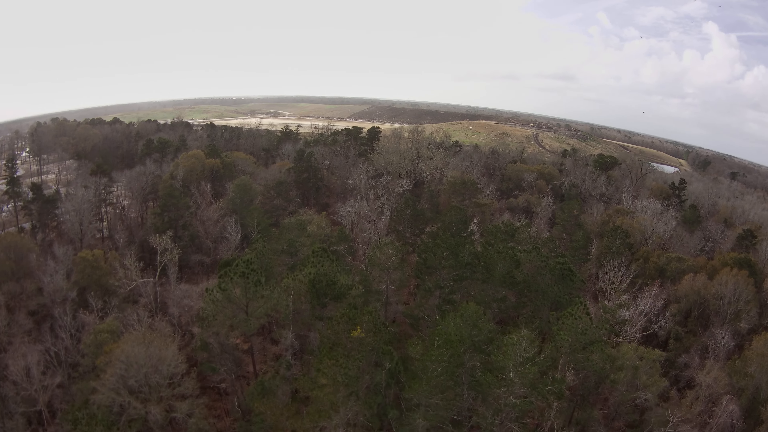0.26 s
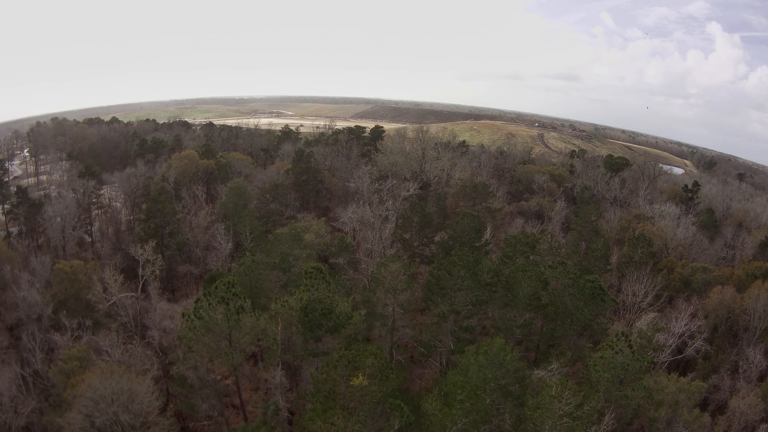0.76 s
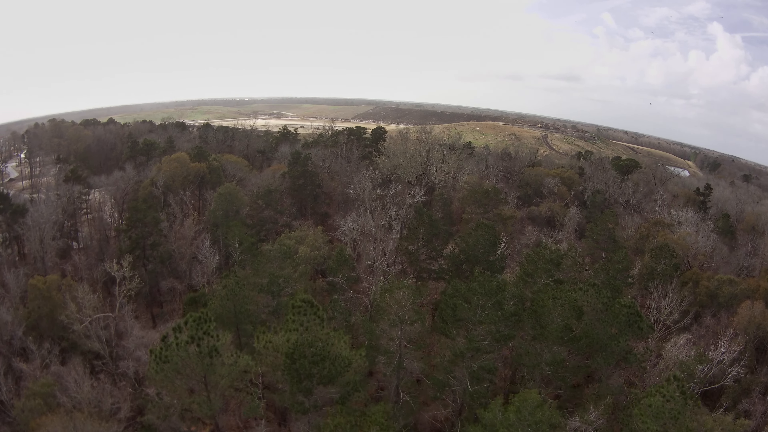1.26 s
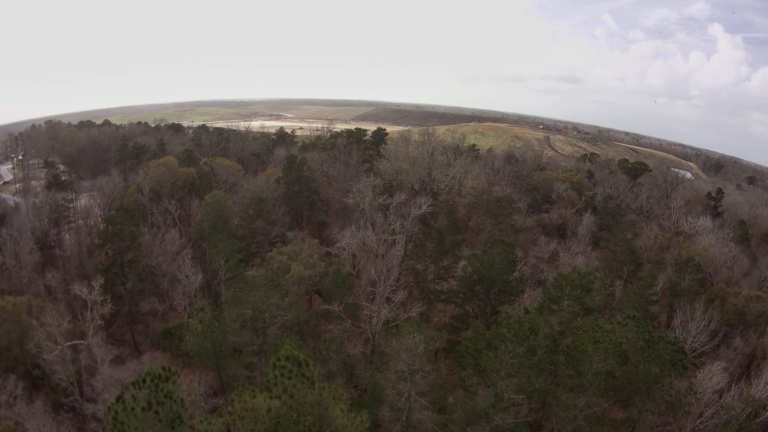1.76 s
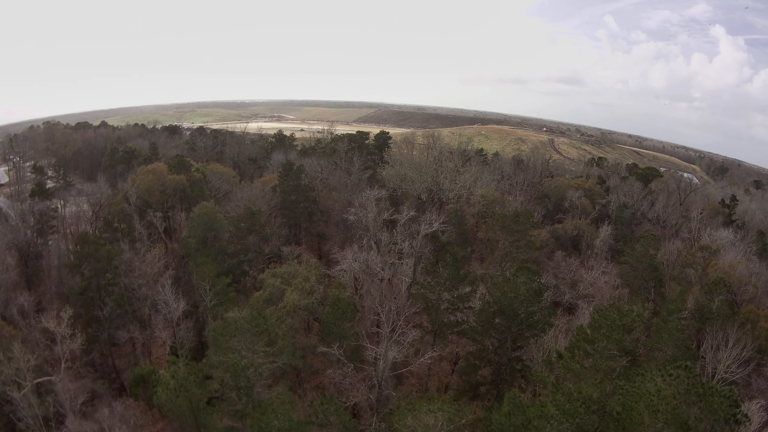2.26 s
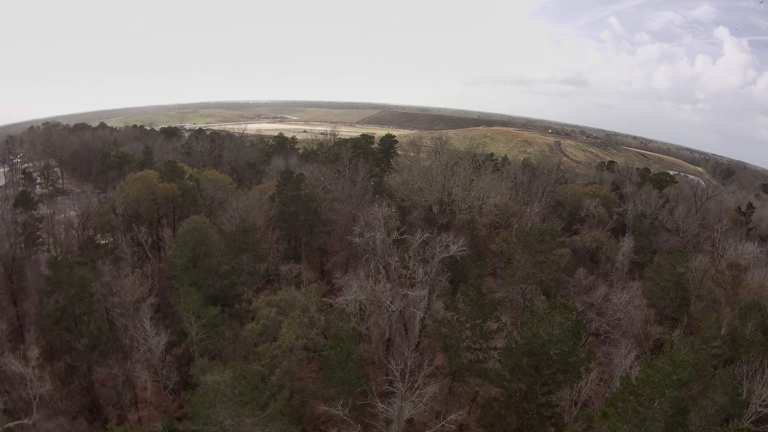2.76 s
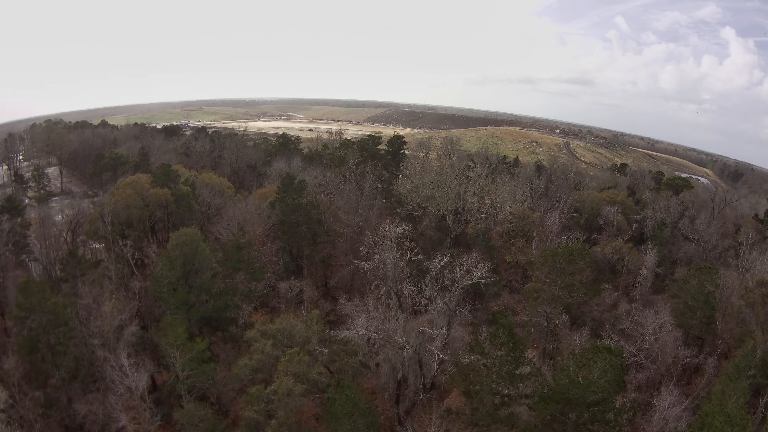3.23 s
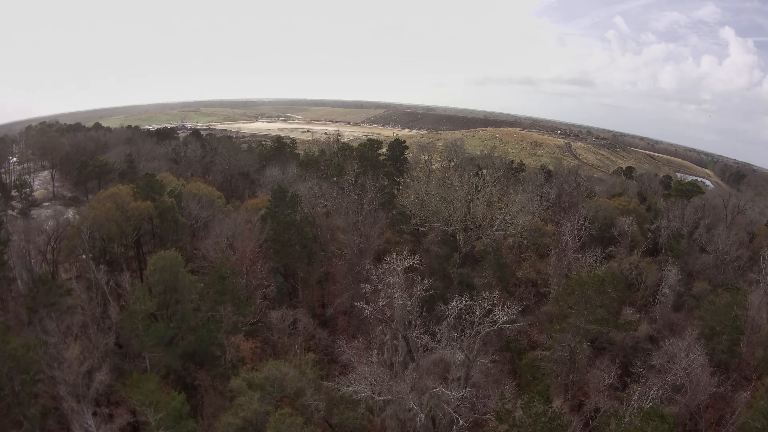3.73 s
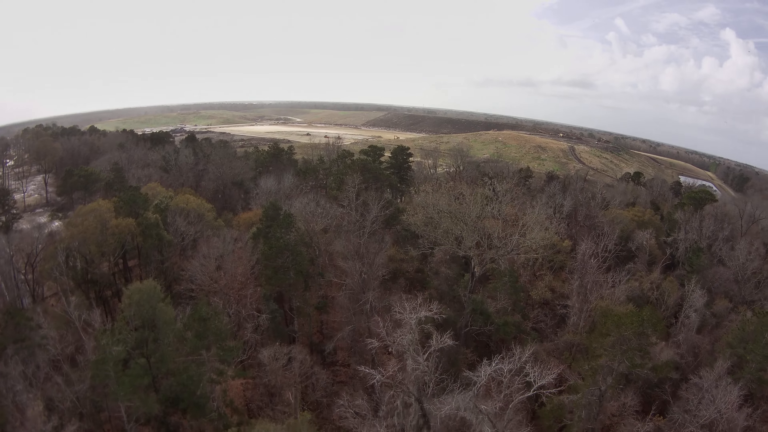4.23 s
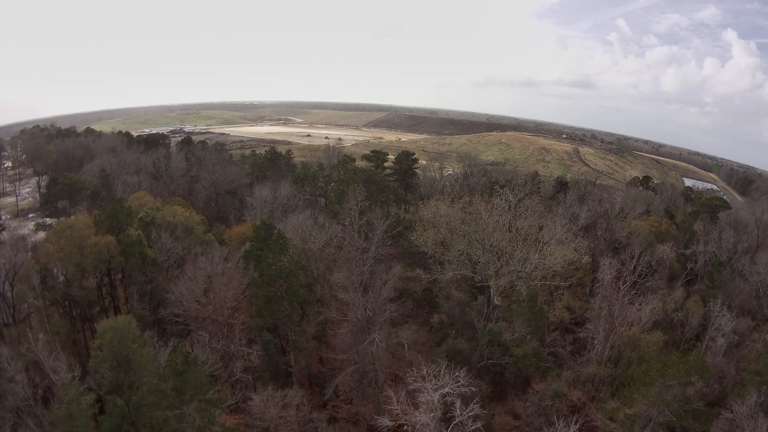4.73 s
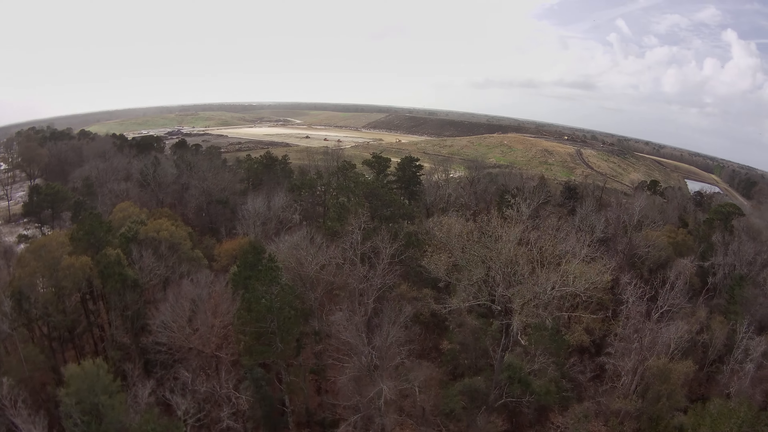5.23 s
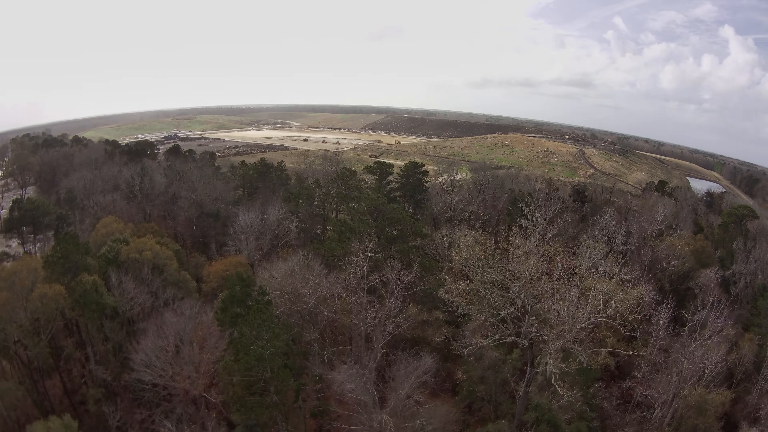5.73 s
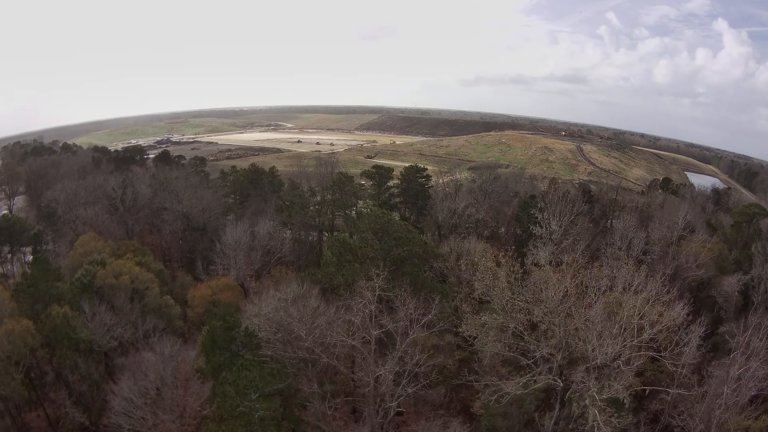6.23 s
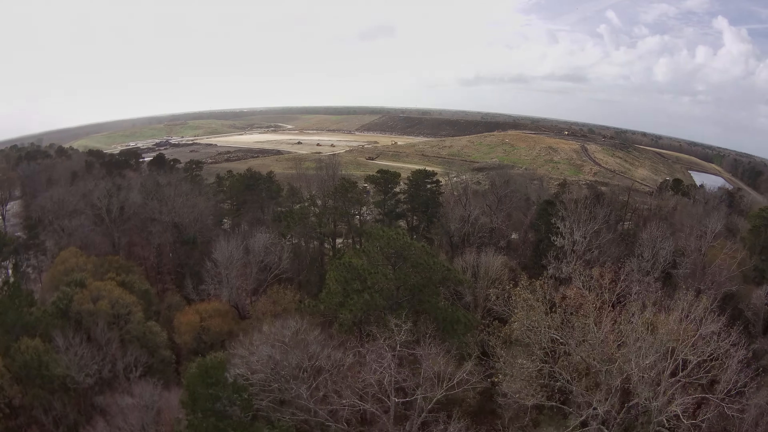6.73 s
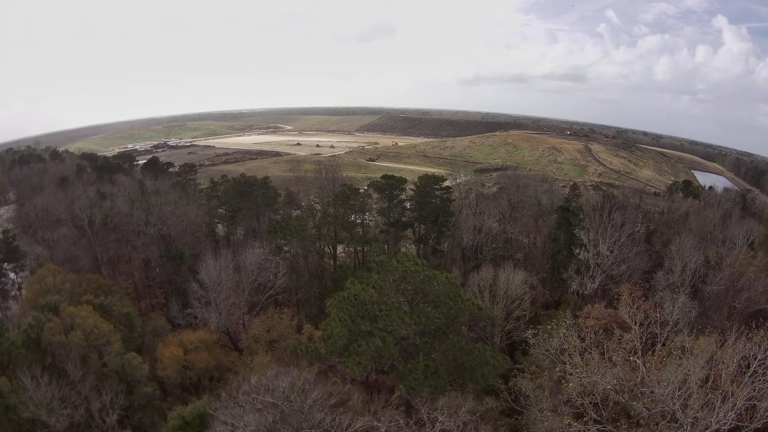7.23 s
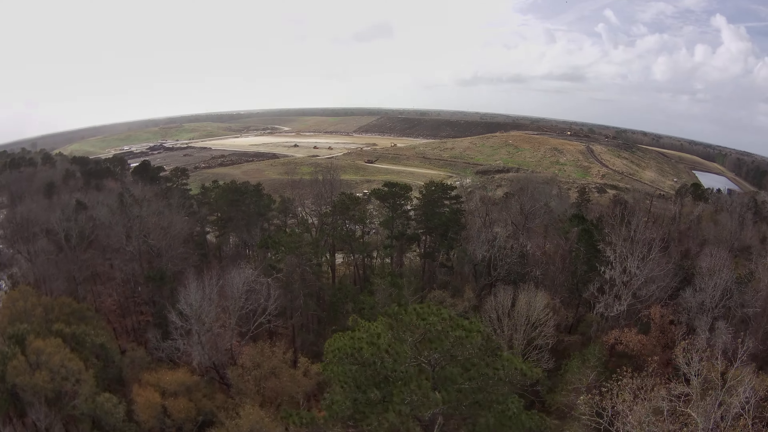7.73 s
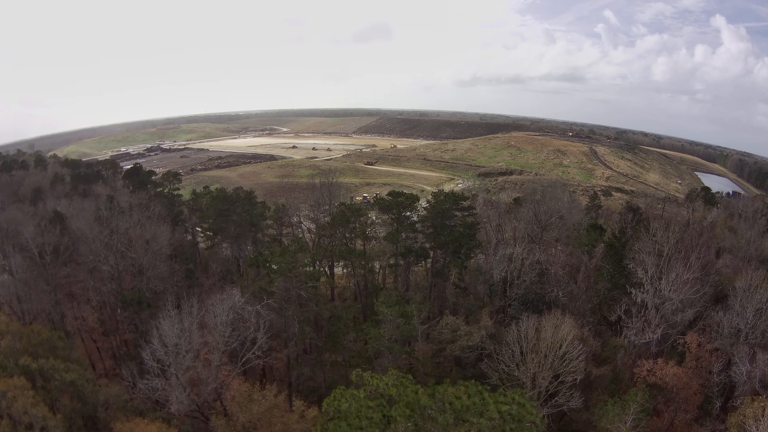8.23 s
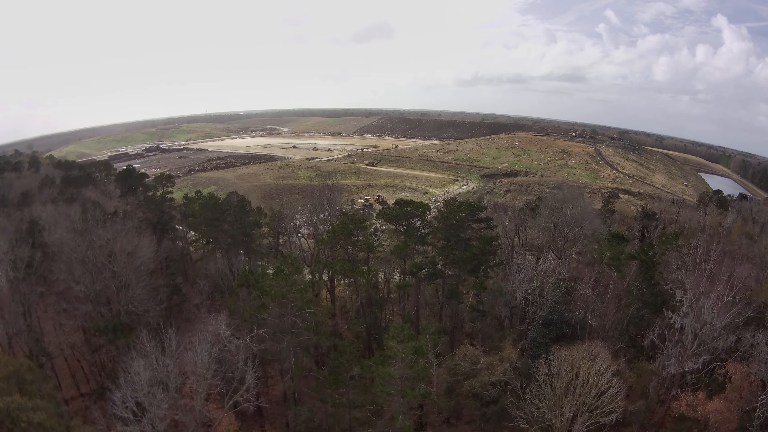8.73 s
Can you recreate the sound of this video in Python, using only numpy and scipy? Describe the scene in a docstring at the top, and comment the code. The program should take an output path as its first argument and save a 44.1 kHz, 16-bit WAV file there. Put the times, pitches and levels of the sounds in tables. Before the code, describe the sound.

Constant close drone buzz from start to end, without pause. Near propellers slap the left microphone with saw-like pulses, gritty air noise and hiss, while the right microphone picks up the vibrating frame and softer blade rush. Slightly mistuned rotors beat against each other, flutter roughens briefly in gusts, and the tone droops a little in the later part. Open air, no echo.

```python
"""A rough, beating rotor buzz throughout: a quadcopter whose four two-blade rotors slowly ease off.
The left port, fixed to the frame, sits in the wash of the near rotors: each blade slaps it with a
saw-shaped pressure wave and bursts of rasp and hiss, over a bed of rumble.
The sheltered right port hears the shaking, rattling frame and the rush of the blades.
Motor whine reaches both ports."""
import sys
import numpy as np
from scipy.fft import rfft, irfft
from scipy.io import wavfile

SR = 44100
rng = np.random.default_rng(int(sys.argv[2]) if len(sys.argv) > 2 else 0)


def output_pcm(signal):
    """Save a mono or channel-first signal as 16-bit PCM at the path in sys.argv[1].

    Samples are clipped to [-1, 1] before scaling.
    """
    pcm = np.clip(np.atleast_2d(signal).T, -1, 1) * 32767
    wavfile.write(sys.argv[1], SR, np.round(pcm).astype(np.int16))


N = 396018

# Speed of the near rotors, as the autopilot trims them: (time [s], blade rate [passes per s])
FIRST_ROTOR_SPEED = [(0.0, 468.1), (0.57, 466.2), (0.94, 471.9), (1.18, 460.4), (1.34, 474.4),
                     (1.91, 459.9), (2.0, 470.7), (2.1, 460.6), (2.77, 473.9), (3.01, 469.8), (3.44, 475.8),
                     (3.87, 459.6), (3.95, 463.1), (4.56, 454.5), (4.99, 461.7), (5.39, 444.8),
                     (5.6, 445.4), (5.68, 463.8), (5.99, 445.5), (6.76, 450.4), (6.98, 440.0),
                     (7.21, 441.1), (7.35, 451.0), (8.08, 436.8), (8.27, 423.5), (8.98, 424.5)]
SECOND_ROTOR_SPEED = [(0.0, 454.7), (0.61, 439.2), (1.19, 458.7), (1.24, 449.3), (1.64, 470.8),
                      (1.88, 455.7), (2.25, 462.8), (2.35, 460.1), (2.73, 480.5), (2.99, 444.3),
                      (3.35, 426.3), (3.45, 446.6), (3.72, 433.1), (3.73, 444.8), (4.89, 432.1),
                      (4.92, 417.6), (5.39, 442.0), (5.68, 411.0), (6.03, 432.0), (6.63, 425.0),
                      (6.84, 403.1), (7.37, 400.7), (7.56, 419.9), (8.25, 405.4), (8.74, 389.6),
                      (8.98, 404.5)]
# Speed the far pair follows: (share of first rotor in a near-pair mix [0-1], added rate [passes per s])
FAR_ROTOR_SPEED = [(.4, 62.3), (.65, 66)]
# Pockets of rough air: (middle [s], half length [s], added blade flutter [rad])
ROUGH_AIR_POCKETS = [(2.05, 0.29, 0.23), (3.0, 0.26, .17), (4.82, 0.16, 0.17), (5.68, .07, 0.2)]
# Pressure wave of a blade, before load and gusts:
# (multiple of blade rate, first rotor level [dB], second rotor level [dB])
BLADE_HARMONICS = [(1, -8.7, -19.2), (2, -17.1, -30), (3, -24, -39), (4, -32, -50), (5, -40, -54),
                   (6, -43, -58)]
# Noise colours of the wash, before their level changes: (frequency [Hz], level [dB per Hz])
RUMBLE_SPECTRUM = [(20, -66), (38, -79), (60, -51), (90, -44.5), (130, -40), (190, -40), (330, -46),
                   (580, -49.5), (800, -50.5), (1100, -54), (1500, -53.5), (2200, -63.5), (5000, -68.5)]
RASP_SPECTRUM = [(500, -73.5), (1500, -62.5), (2500, -62), (4000, -62), (5300, -62.5), (6200, -57.5),
                 (6900, -65), (9000, -67), (14000, -76)]
HISS_SPECTRUM = [(2000, -73.5), (5000, -65.5), (8000, -75), (10500, -64), (12000, -63), (13200, -56.5),
                 (14400, -53.5), (15500, -51.5)]
# Level curve of the hiss, around its base gain: (time [s], level [dB])
HISS_CURVE = [(0.1, 0), (0.6, 0.5), (1.7, 1), (2.4, 2.5), (2.8, 0.5), (4.2, 0.5), (4.65, -1), (5.7, 1.7),
              (6.3, -0.2), (7.15, -2.3), (7.5, -0.2), (8.9, 0.5)]
# Shaking of the frame, before resonance, waver and port level:
# (multiple of shaft rate, rotor one [dB], rotor two [dB], rotor three [dB], rotor four [dB])
SHAFT_HARMONICS = [(1, -37, -46, -38.5, -52), (2, -20.2, -25, -27.5, -36), (3, -34, -37, -39.5, -48),
                   (4, -44, -38, -37.5, -46), (5, -49, -48, -38, -42), (6, -35, -35, -34, -40),
                   (7, -47, -43, -53, -53), (8, -54, -50, -54, -57), (10, -54, -49, -55, -57)]
# Lag of each rotor's blade tone at the sheltered port behind the open one: one value per rotor [rad]
SHELTERED_LAG = [2.2, 0.6, -2, 4.5]
# Sum tones of the rattling frame:
# (near rotor [0 or 1], multiple of third shaft added to its blade rate, level [dB])
RATTLE_TONES = [(1, 2, -40), (0, 3, -35), (1, 3, -39), (0, 4, -33), (1, 4, -36)]
# Motor whine as the shell passes it, before each motor's trim:
# (frequency [Hz], open port level [dB], sheltered port level [dB])
SHELL_RESPONSE = [(7000, -42, -41), (7600, -34.5, -41), (7900, -41, -44), (8150, -40, -46),
                  (8500, -37.5, -52), (9000, -42, -46), (9500, -36.5, -45), (10500, -45, -80),
                  (14300, -32.5, -75), (15500, -37, -80)]
# Trim of each motor: (whine gain [dB], octave gain [dB])
MOTOR_TRIMS = [(.5, -5), (-2.5, 6), (0, -7), (0, -7)]
# Rush of the blades at the sheltered port: (frequency [Hz], level [dB per Hz])
RUSH_SPECTRUM = [(20, -90), (90, -76), (140, -77), (250, -66), (330, -68), (580, -61), (700, -56),
                 (850, -62), (1100, -61), (1400, -54.5), (1900, -64), (2250, -61), (3500, -62), (4400, -72),
                 (5300, -72), (6000, -67), (6800, -76), (7700, -70), (9300, -82), (10200, -112)]

# Random movements below are given as spreads; their pace is the argument of drift().
HUNT_HZ, HUNT_PACE = 1.5, 2   # far rotors stray from their speed [blade passes per s, Hz]
WOBBLE_RAD, WOBBLE_PACE = 0.13, 8   # quick small speed corrections of every rotor [rad, Hz]
CALM_FLUTTER_RAD = 0.084
LOAD_DB = 0.95   # first rotor's wave at mean speed
# Level changes per blade pass per second that the near pair runs above its mean speed
LOAD_DB_PER_HZ, RASP_DB_PER_HZ, RUMBLE_DB_PER_HZ = -0.0325, 0.05, 0.0284
HISS_DB = 0.5   # base gain, to which the curve and flicker are added
FRAME_HZ, FRAME_WIDTH_HZ = 460, 115   # main resonance of the frame
SHAKE_STRAY_RAD = 0.4   # the loose frame follows the shafts unevenly
COGS_PER_TURN = 36
HIGH_CUT_HZ = 15500


def from_db(db):
    """Turn decibels into an amplitude factor."""
    return 10 ** (np.asarray(db) / 20)


def in_time(rows):
    """Read a two-column curve table, giving one value per sample."""
    seconds, values = np.transpose(rows)
    return np.interp(np.arange(N) / SR, seconds, values)


def at_hz(points, hz, column=1):
    """Read one level column of a spectrum table on a log-frequency axis."""
    points = np.array(points)
    return np.interp(np.log(np.maximum(hz, 1)), np.log(points[:, 0]), points[:, column])


def bin_hz():
    """Frequency of each spectrum bin."""
    return np.arange(N // 2 + 1) * SR / N


def drift(pace_hz):
    """Smooth random movement with a spread of 1, made by low-passing white noise."""
    spectrum = rfft(rng.standard_normal(N))
    slow = irfft(spectrum / (1 + (bin_hz() / pace_hz) ** 2), N)
    return slow / slow.std()


def noise(spectrum, gate=1):
    """White noise, chopped by a gate brought to unit power, then coloured."""
    unit_gate = gate / np.sqrt(np.mean(np.square(gate)))
    white = rng.standard_normal(N) * unit_gate
    colour = from_db(at_hz(spectrum, bin_hz()))
    return irfft(rfft(white) * colour, N) * np.sqrt(SR / 2)


def tone(db, angle):
    """A sine of the given rms level."""
    return np.sqrt(2) * from_db(db) * np.sin(angle)


def rotor_rates():
    """Blade passes per second of all four rotors: the far pair follows a mix of the near pair."""
    first, second = in_time(FIRST_ROTOR_SPEED), in_time(SECOND_ROTOR_SPEED)
    rates = [first, second]
    for share, extra in FAR_ROTOR_SPEED:
        followed = share * first + (1 - share) * second
        rates.append(followed + extra + HUNT_HZ * drift(HUNT_PACE))
    return rates


def rough_air():
    """Blade flutter in radians: slight in calm air, swelling and fading in each gust."""
    t = np.arange(N) / SR
    flutter = CALM_FLUTTER_RAD
    for middle, half, strength in ROUGH_AIR_POCKETS:
        flutter = flutter + strength * np.exp(-((t - middle) / half) ** 2)
    return flutter


def blade_angles(rates, flutter):
    """One cycle per blade pass; every rotor wobbles in speed and flutters in the rough air."""
    angles = []
    for rate in rates:
        steady = 2 * np.pi * np.cumsum(rate) / SR
        wobble = WOBBLE_RAD * drift(WOBBLE_PACE)
        angles.append(steady + wobble + flutter * drift(21))
    return angles


def blade_wave(angles, load_db, unsteady_db):
    """Pressure builds as a near blade comes and drops as it passes; gusts vary the drop's sharpness."""
    wave = np.zeros(N)
    for rotor, rotor_db in enumerate([load_db, 0]):
        gust_db = unsteady_db * drift(16)
        for multiple, *levels in BLADE_HARMONICS:
            # Higher harmonics swing further, so the edge sharpens and softens
            level_db = levels[rotor] + rotor_db + gust_db * np.sqrt(multiple)
            wave -= tone(level_db, multiple * angles[rotor])
    return wave


def slaps(angle, level_db, uneven_db, top_harmonic=16):
    """The nearest blade ends its wave in a sharp edge, of uneven strength: equal upper harmonics."""
    edge = np.zeros(N)
    for multiple in range(len(BLADE_HARMONICS) + 1, top_harmonic + 1):
        edge -= tone(level_db, multiple * angle)
    return edge * from_db(uneven_db * np.minimum(drift(200), 2))


def bursts(angles, second_share, depth, sharpness, lead, uneven_db):
    """Turbulence hits the port with each blade, hardest when both near rotors pass together."""
    push = np.cos(angles[0] + lead) + second_share * np.cos(angles[1] + lead)
    push = np.maximum(push, 0)
    return np.sqrt(1 + depth * push ** sharpness) * from_db(uneven_db * drift(360))


def wash(angles, flutter, throttle_hz, rumble_db_per_radian, flicker_db, swell_db):
    """Air thrown at the open port: rumble, rasp and hiss, the latter two chopped by the blades."""
    flicker = flicker_db * drift(16) + swell_db * drift(2.7)
    wide = bursts(angles, second_share=0.3, depth=1.9, sharpness=3.5, lead=0, uneven_db=1.7)
    narrow = bursts(angles, second_share=0.3, depth=2.4, sharpness=4.2, lead=-0.1, uneven_db=1.9)
    gust_db = rumble_db_per_radian * (flutter - flutter.mean())
    rumble = from_db(RUMBLE_DB_PER_HZ * throttle_hz + gust_db) * noise(RUMBLE_SPECTRUM)
    rasp = from_db(RASP_DB_PER_HZ * throttle_hz + flicker) * noise(RASP_SPECTRUM, wide)
    hiss = from_db(HISS_DB + in_time(HISS_CURVE) + flicker) * noise(HISS_SPECTRUM, narrow)
    return rumble + rasp + hiss


def frame(rates, angles, waver_db, open_port_db):
    """Unbalanced shafts shake the frame at their multiples; the blade tone swells near its resonance."""
    ports = np.zeros((2, N))
    for rotor, (rate, angle) in enumerate(zip(rates, angles)):
        resonance_db = -10 * np.log10(1 + (2 * (rate - FRAME_HZ) / FRAME_WIDTH_HZ) ** 2)
        # Alternate multiples share one of two wavers and strays
        wavers = [from_db(waver_db * drift(4)) for _ in range(2)]
        strays = [SHAKE_STRAY_RAD * drift(14) for _ in range(2)]
        for n, (multiple, *levels) in enumerate(SHAFT_HARMONICS):
            if round(multiple) == 2:   # blade tone, two blades a turn: sheltered port only
                ports[1] -= tone(levels[rotor] + resonance_db, angle - SHELTERED_LAG[rotor])
                continue
            start = rng.uniform(0, 2 * np.pi)
            shaft_angle = round(multiple) * angle / 2 + strays[n % 2] + start
            shake = wavers[n % 2] * tone(levels[rotor], shaft_angle)
            direction = (-1) ** (n + rotor)   # ports move with or against each other
            ports[0] += direction * from_db(open_port_db) * shake
            ports[1] += shake
    return ports


def rattle(angles):
    """Play in the frame lets the near blades modulate the third rotor's shaking into sum tones."""
    total = np.zeros(N)
    for near, multiple, db in RATTLE_TONES:
        total += tone(db, angles[round(near)] + round(multiple) * angles[2] / 2)
    return total


def motors(rates, angles, jitter, waver_db):
    """Magnets snap past the stator teeth 36 times a turn: a rough whine and its octave."""
    ports = np.zeros((2, N))
    for rate, angle, (whine_db, octave_db) in zip(rates, angles, MOTOR_TRIMS):
        cog_hz = rate * COGS_PER_TURN / 2   # two blade passes a turn
        waver = waver_db * drift(25)
        cog_angles = [angle * COGS_PER_TURN / 2 + jitter * drift(70) for _ in range(2)]
        for port, cog_angle in enumerate(cog_angles):
            shell_db = at_hz(SHELL_RESPONSE, cog_hz, column=port + 1)
            ports[port] += tone(shell_db + waver + whine_db, cog_angle)
        # Only the open port hears the octave
        shell_db = at_hz(SHELL_RESPONSE, 2 * cog_hz)
        ports[0] += tone(shell_db + waver + octave_db, 2 * cog_angles[0])
    return ports


def rush():
    """The rush of the blades at the sheltered port is steady coloured noise."""
    return noise(RUSH_SPECTRUM)


def scene():
    """Mix the open port on the left and the sheltered port on the right."""
    rates, flutter = rotor_rates(), rough_air()
    angles = blade_angles(rates, flutter)
    near_speed = (rates[0] + rates[1]) / 2
    throttle_hz = near_speed - near_speed.mean()
    load_db = LOAD_DB + LOAD_DB_PER_HZ * throttle_hz
    blades = blade_wave(angles, load_db, unsteady_db=6.9 * flutter)
    edges = slaps(angles[0], level_db=-44.5, uneven_db=3)
    air = wash(angles, flutter, throttle_hz, rumble_db_per_radian=4, flicker_db=1.03, swell_db=0.37)
    shaking = frame(rates, angles, waver_db=1.5, open_port_db=-8)
    whine = motors(rates, angles, jitter=0.45, waver_db=2.8)
    open_port = blades + edges + air
    sheltered_port = rattle(angles) + rush()
    return np.array([open_port, sheltered_port]) + shaking + whine


def record(dry):
    """Overload rounds the highest peaks; then the deepest bass and the top are cut."""
    rounded = dry / (1 + (dry / 0.98) ** 8) ** (1 / 8)
    hz = bin_hz()
    low_cut = hz ** 2 / np.sqrt(hz ** 4 + 33 ** 4)   # corner at 33 Hz
    high_cut = np.clip((HIGH_CUT_HZ - hz) / 100 + 0.5, 0, 1)   # 100 Hz wide slope
    return irfft(rfft(rounded) * low_cut * high_cut, N)


dry = scene()
out = record(dry)
output_pcm(out)
```